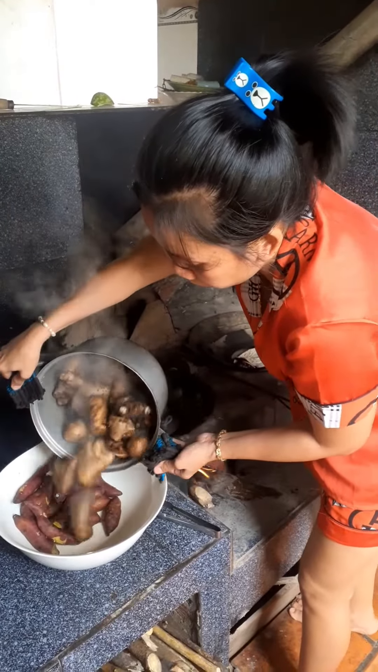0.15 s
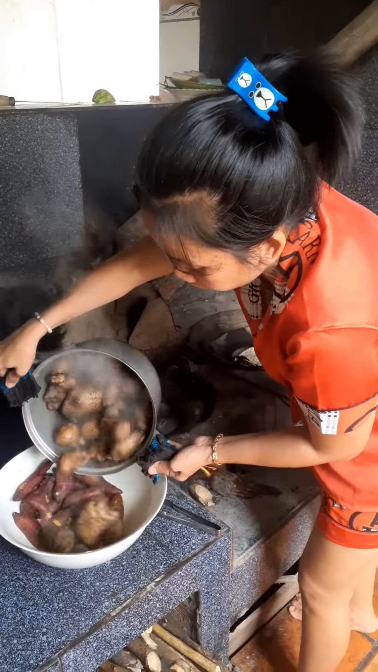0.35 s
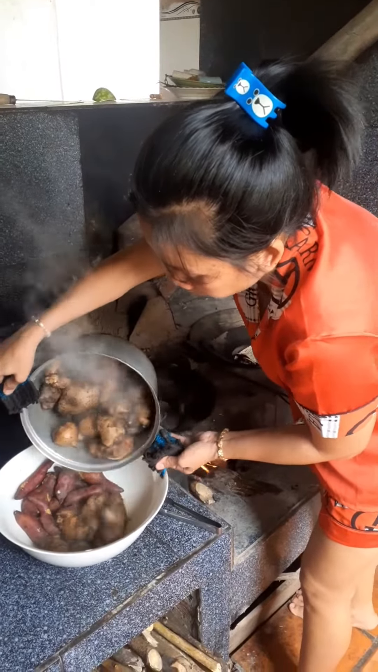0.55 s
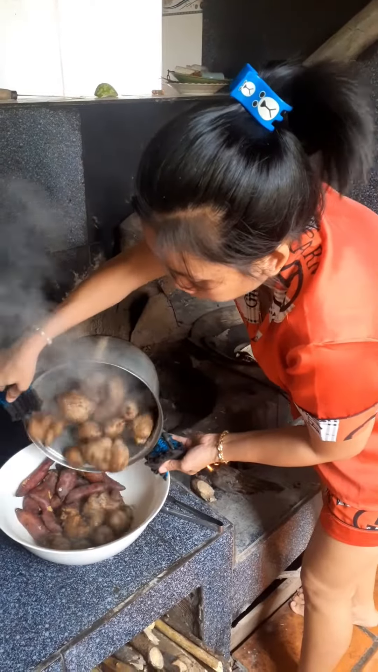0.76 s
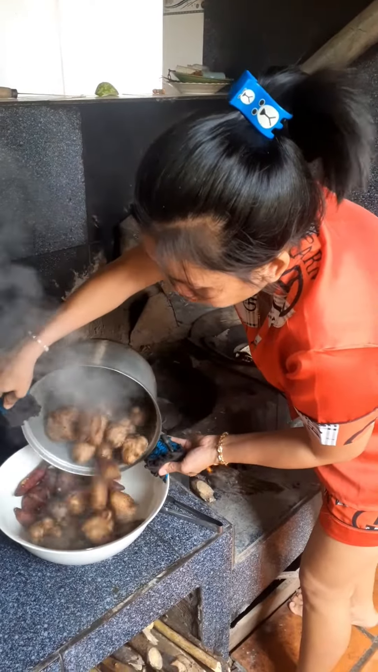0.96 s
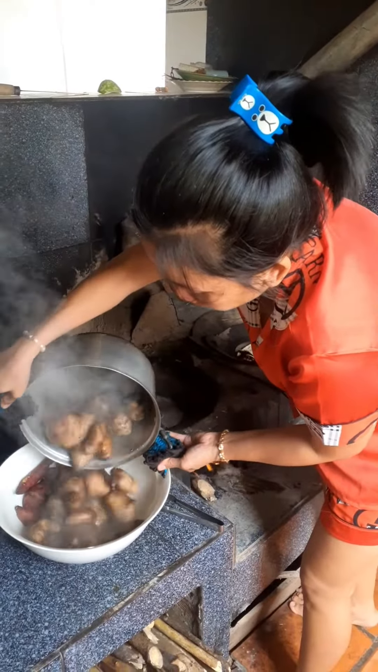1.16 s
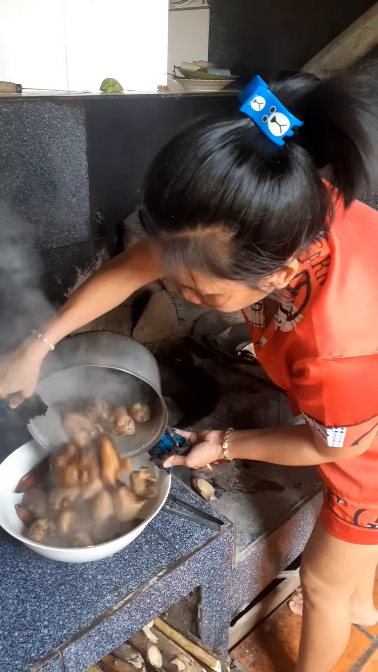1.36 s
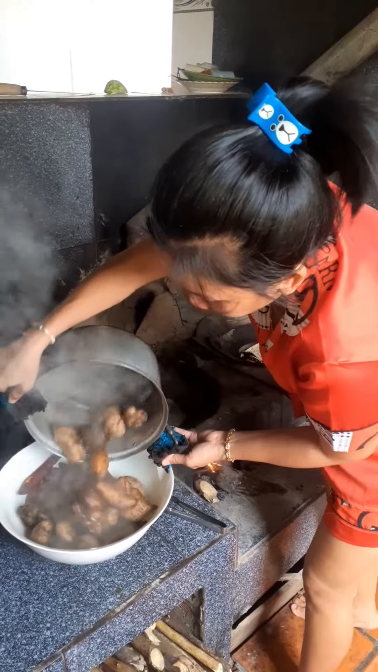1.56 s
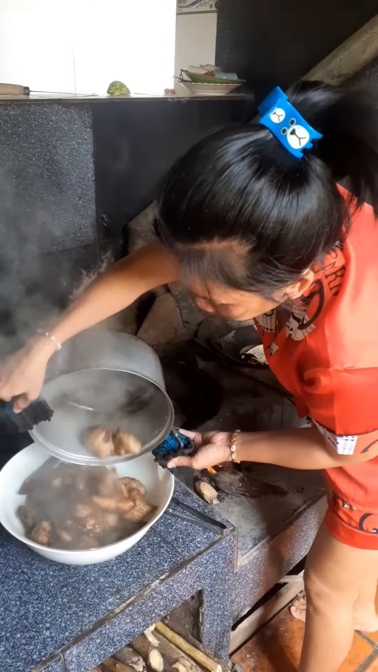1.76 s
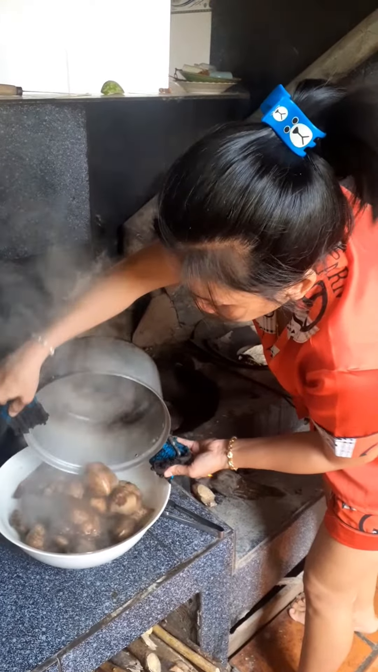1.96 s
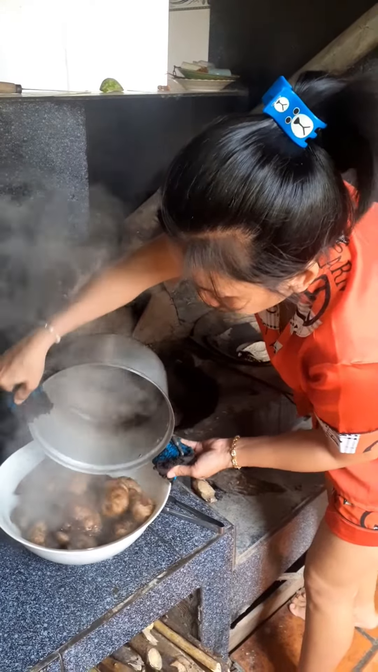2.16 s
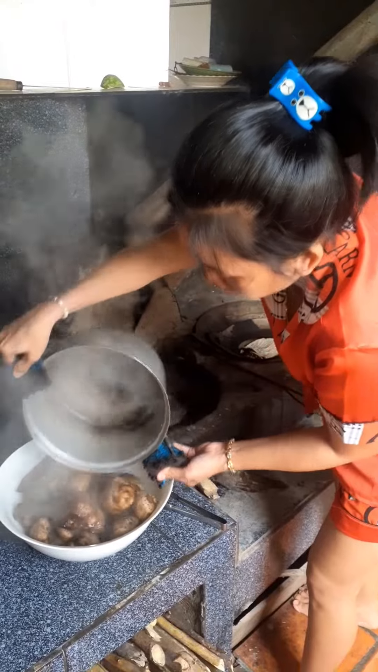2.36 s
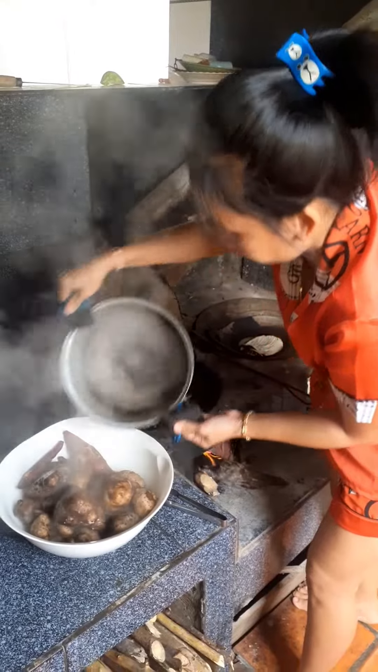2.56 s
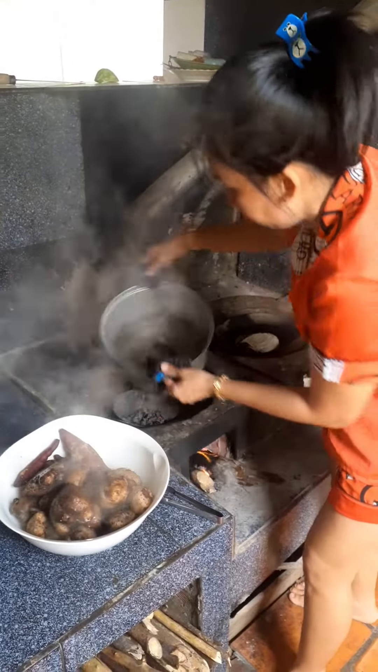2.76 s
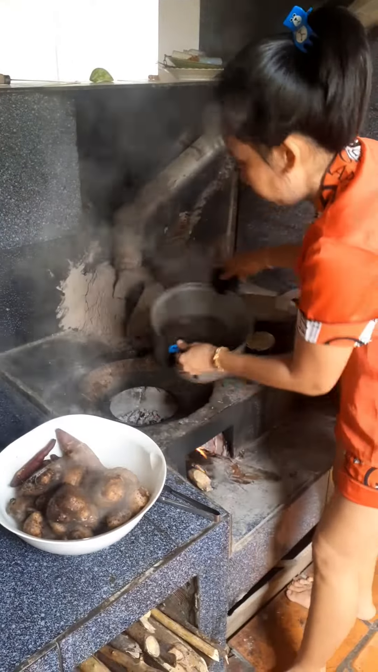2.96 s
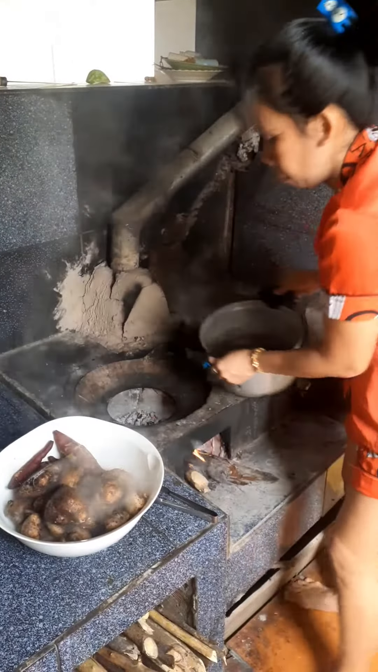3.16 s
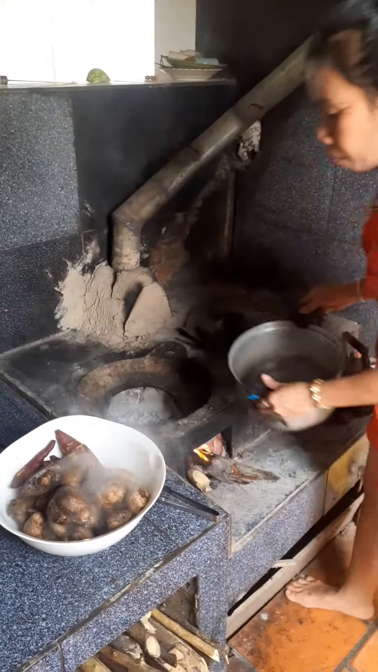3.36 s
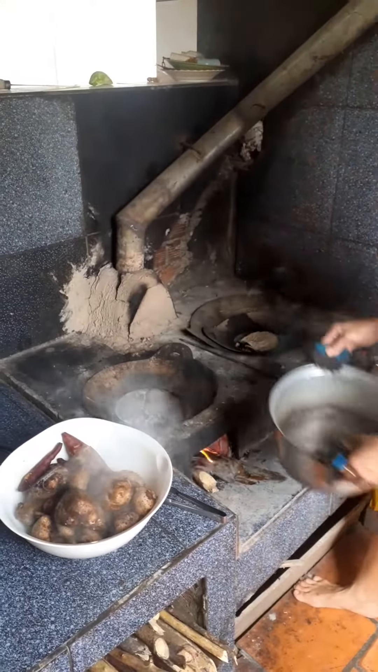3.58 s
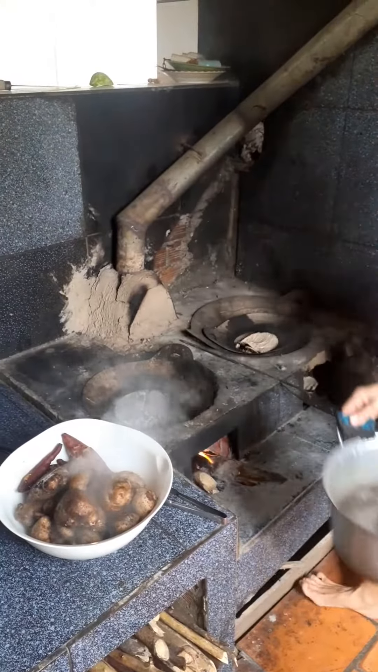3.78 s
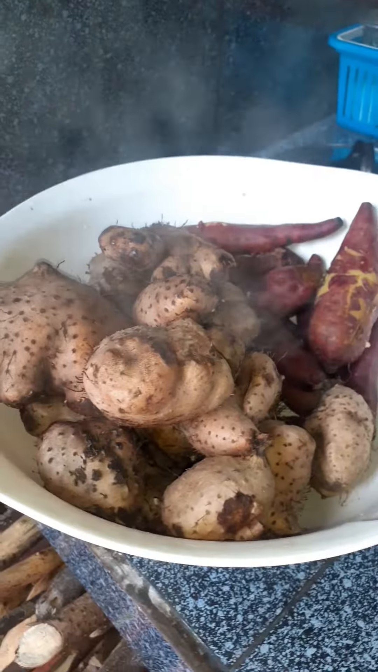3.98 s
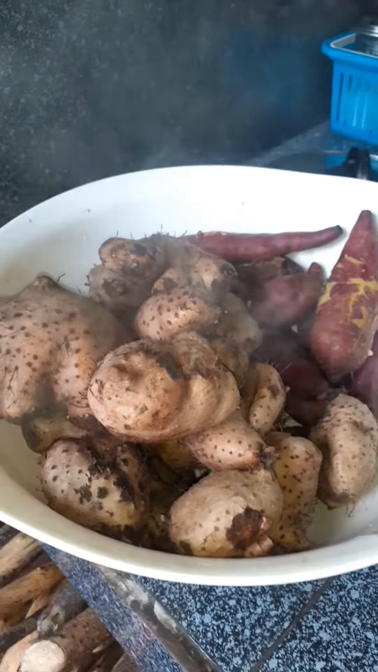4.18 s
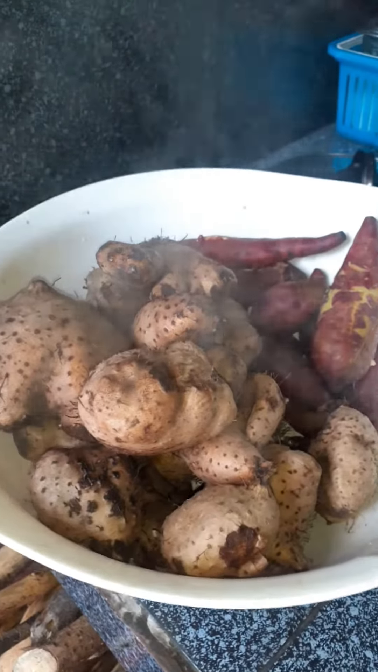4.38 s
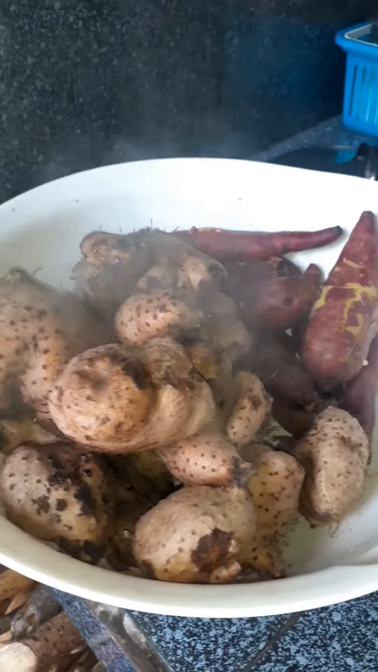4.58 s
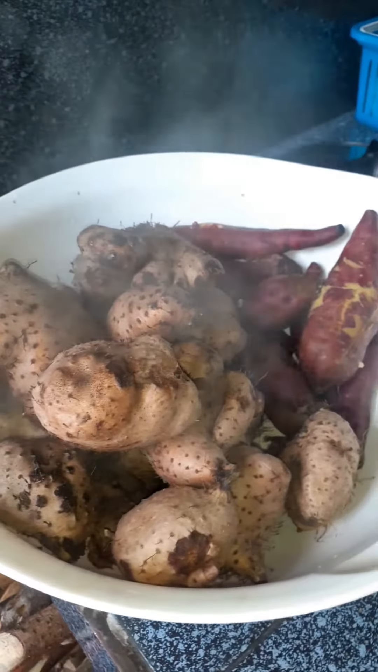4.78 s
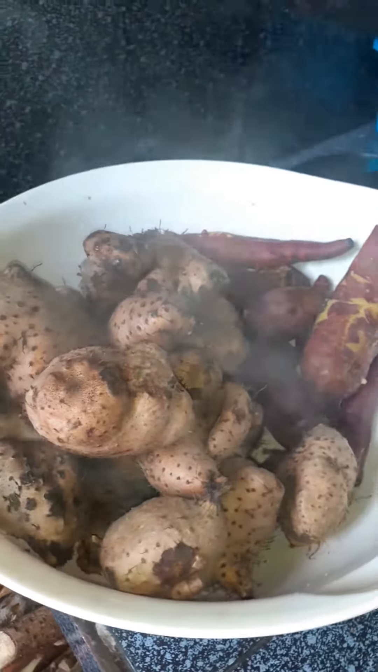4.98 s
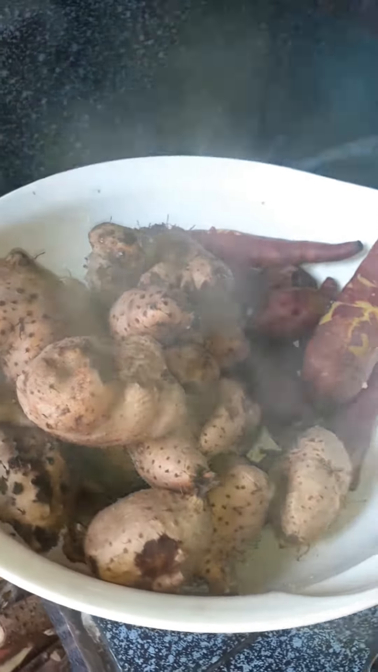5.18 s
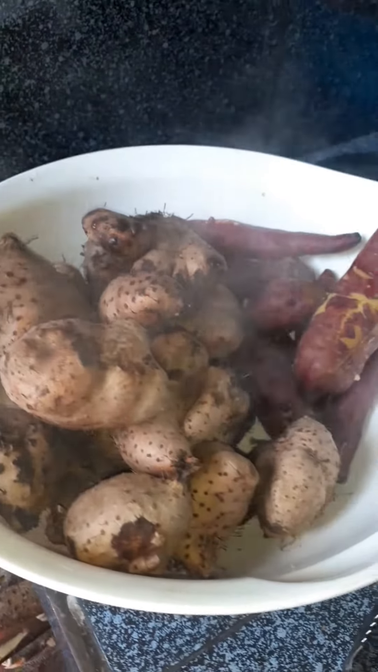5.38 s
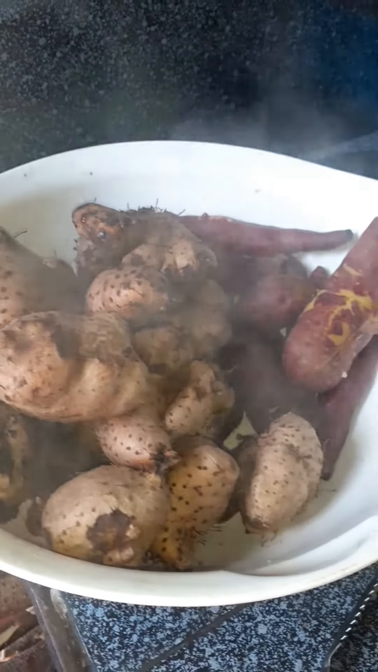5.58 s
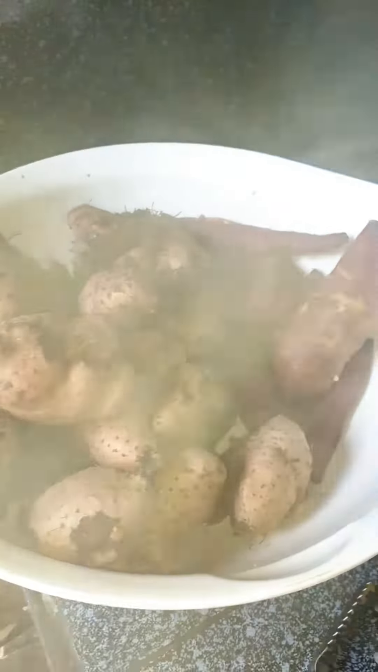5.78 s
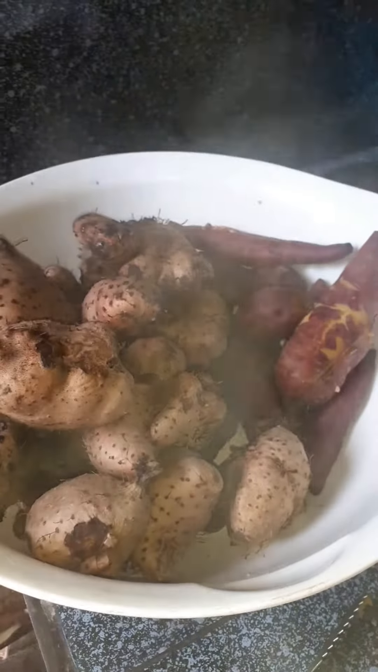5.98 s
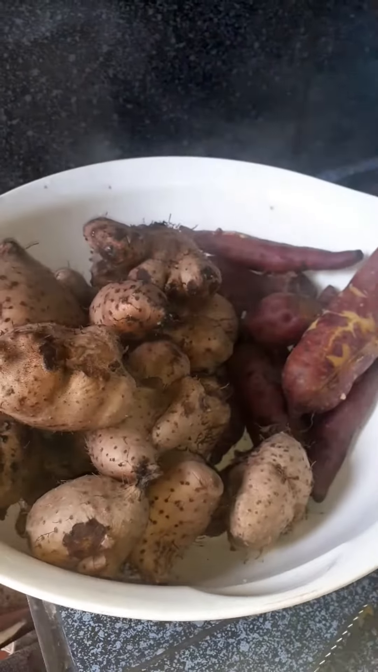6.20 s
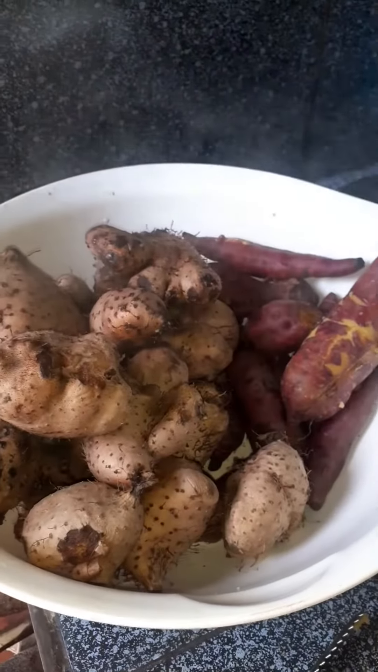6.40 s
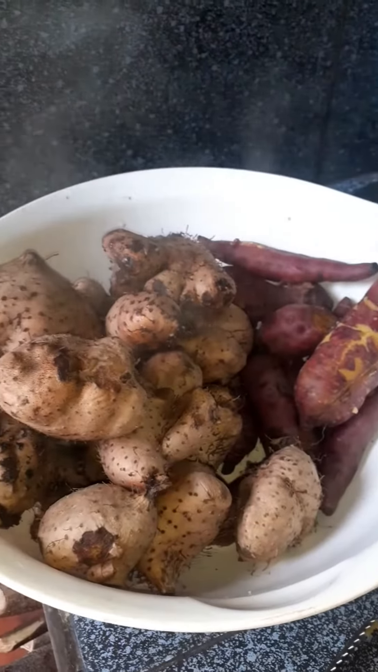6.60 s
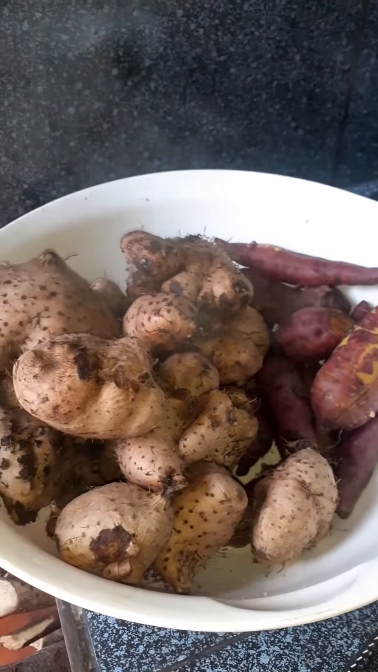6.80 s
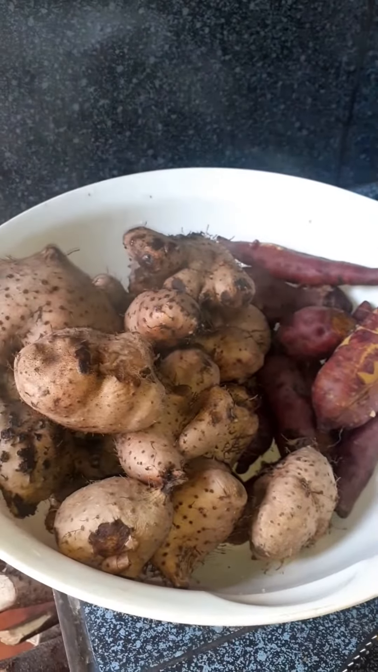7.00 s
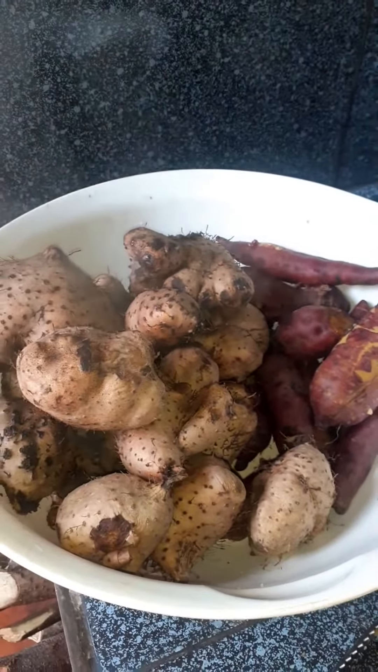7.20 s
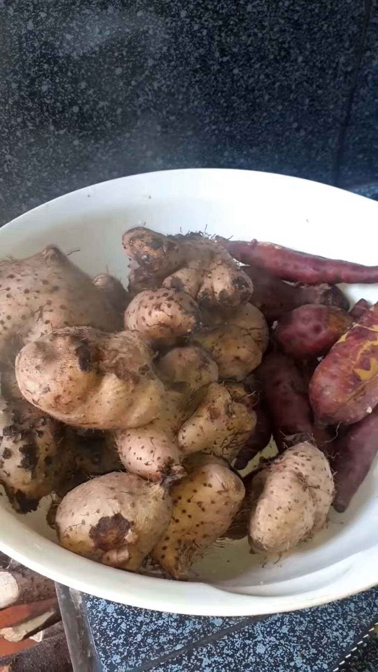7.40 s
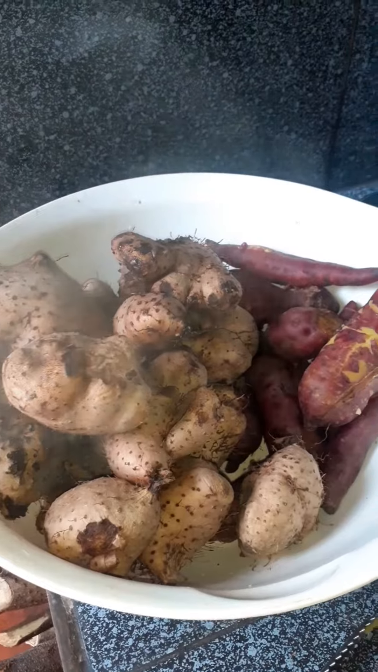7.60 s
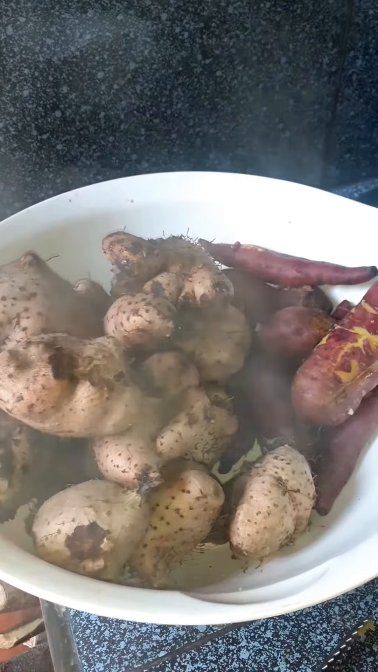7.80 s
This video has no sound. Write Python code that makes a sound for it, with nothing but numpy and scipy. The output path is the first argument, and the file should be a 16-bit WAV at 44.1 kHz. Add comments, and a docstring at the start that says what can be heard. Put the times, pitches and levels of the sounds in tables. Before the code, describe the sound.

A close stereo pickup in a hard-walled kitchen with short, dense echoes and faint low room tone. From 0 to about 0.7 s boiled potatoes tumble from a tilted metal pot into a bowl: rapid soft, low thuds, the loudest near 0.25 and 0.55 s, with wet slaps, sticky sliding and a dull rolling rumble. Another cluster lands around 0.9-1.1 s, then sparse faint bumps until 2.2 s, with thin rim clanks near 0.55, 0.95 and 1.7 s. Around 2.7-3.8 s come light handle ticks, a faint sizzle and hollow pot rattles, clearest at 3.15 s. A blink of silence just before 4 s cuts to water gushing and splashing, drumming on a basin with bubbling, low gulps and fine spray. After 5.4 s it drops away to weak spurts around 5.9-6.4 s, then plops and bright single drips until about 6.85 s, leaving quiet room tone and a faint wavering hum.

```python
"""Soft thuds and wet slaps: boiled potatoes roll out of a tilted metal pot into a bowl in a hard-walled kitchen.
Each thud is a set of damped modes; shaped noise gives the slaps, the rumble and the pot's clanks, and swarms
of tiny decaying sines the wet slides. After a blink of silence water gushes and splashes, sloshes on in weaker
spurts and ends in single drips: noise drums on a basin, decaying sines of rising pitch are the bubbles, and
short pings the drops. Random echoes and a faint room tone surround both parts."""
import sys
import numpy as np
from scipy import signal
from scipy.fft import rfft, irfft, next_fast_len
from scipy.io import wavfile
from scipy.ndimage import map_coordinates

SR = 44100
rng = np.random.default_rng(int(sys.argv[2]) if len(sys.argv) > 2 else 0)


def master(y):
    """Save y as 16-bit WAV."""
    cut = np.clip(np.atleast_2d(y).T, -1, 1)
    pcm = np.round(cut * 32767)  # scale
    wavfile.write(sys.argv[1], SR, pcm.astype(np.int16))


N = 346185  # length of the scene in samples
T = np.arange(int(0.8 * SR)) / SR  # time axis of one short event or echo, in seconds

# Potatoes landing. Each row: start in seconds, level in dB, pitch of the thud in Hz,
# level of the slap against the thud in dB.
POTATO_LANDINGS = [(0.001, -10, 312, -7), (0.013, -18.5, 321, -46), (0.052, -14.5, 342, -13),
                   (0.085, -22, 340, -20), (0.123, -27.5, 548, -13), (0.157, -28, 376, -13),
                   (0.237, -7, 257, -14.5), (0.251, -3.5, 379, -17), (0.281, -12.5, 340, -9.5),
                   (0.294, -13, 277, -12), (0.339, -19, 377, -14), (0.361, -15.5, 265, -21),
                   (0.392, -14, 246, -15.5), (0.41, -26, 293, -13), (0.448, -14, 419, -11),
                   (0.458, -14.5, 251, -12.5), (0.493, -28, 275, -28), (0.528, -20.5, 406, -7.5),
                   (0.558, -5.5, 310, -15), (0.585, -18.5, 288, -24), (0.6, -19, 282, -24),
                   (0.632, -23.5, 304, -20.5), (0.662, -24.5, 300, -19), (0.702, -28, 344, -15.5),
                   (0.862, -22.5, 234, -21), (0.92, -13, 266, -15.5), (0.929, -9, 281, -10.5),
                   (0.969, -14.5, 244, -25), (1.006, -15, 384, -20), (1.036, -22, 250, -24),
                   (1.075, -28, 279, -27), (1.182, -32, 256, -14), (1.244, -42, 270, -23),
                   (1.399, -31, 247, -27), (1.415, -35, 261, -20), (1.436, -32.5, 336, -7.5),
                   (1.449, -33, 245, -11.5), (1.477, -32, 235, -18), (1.5, -42, 290, -20),
                   (1.691, -35.5, 338, -2.5), (1.929, -26.5, 285, -13), (1.944, -28, 254, -10),
                   (1.963, -32, 255, -18), (2.186, -39, 233, -13), (2.21, -46, 259, -21),
                   (2.224, -42, 297, -14)]
# Likeness of left and right. Each row: frequency in Hz, correlation from 0 to 1.
STEREO_LIKENESS = [(130, 0.96), (290, 0.94), (640, 0.085), (1400, 0)]
# Colour of splashing water. Each row: frequency in Hz, level in dB.
SPLASH_COLOUR = [(240, 3.5), (400, 1.5), (449, -4), (650, -8), (708, -3), (982, -6.5), (1180, -6),
                 (1330, -9), (1630, -1), (2080, -8.5), (2570, -4), (3490, -11), (5000, -28), (6500, -50),
                 (11000, -120)]
# Colour of fine spray. Each row: frequency in Hz, level in dB.
SPRAY_COLOUR = [(1650, -39), (2800, -9), (4420, -6), (6100, -2), (7240, -1.5), (8060, -4.5), (9840, -19),
                (12200, -10.5), (14900, -17), (15400, -16)]


def amp(db):
    """Amplitude ratio of a level: 20 dB is a factor of ten."""
    return 10 ** (np.asarray(db) / 20)


def unit(x):
    """Normalise the mean power: scale to rms 1."""
    return x / np.sqrt(np.mean(x ** 2) + 1e-20)


def peaked(x):
    """Normalise the amplitude: scale to peak 1."""
    return x / (np.abs(x).max() + 1e-20)


def fade(t, t60):
    """Exponential damping: the amplitude falls by 60 dB in t60."""
    return np.exp(-np.log(1000) * t / t60)


def along(points, hz):
    """Interpolate (Hz, value) points linearly in log frequency."""
    point_hz, values = np.transpose(points)
    return np.interp(np.log(hz + 1), np.log(point_hz), values)


def curves(rows):
    """Interpolate linearly in time: one value per sample for each column after the time."""
    times, *columns = np.transpose(rows)
    return [np.interp(np.arange(N) / SR, times, column) for column in columns]


def add(track, s, sound):
    """Superpose a sound on the track at time s."""
    start = max(round(s * SR), 0)
    track[:, start:start + sound.shape[-1]] += sound[..., :N - start]


def filtered(x, response):
    """Linear filtering: multiply the spectrum of x by a response of frequency."""
    size = next_fast_len(x.shape[-1] + 4096)
    spectrum = rfft(x, size) * response(np.fft.rfftfreq(size, 1 / SR))
    return irfft(spectrum, size)[..., :x.shape[-1]]


def coloured(x, spectrum):
    """Spectral shaping: filter x by a curve of (Hz, dB)."""
    return filtered(x, lambda hz: amp(along(spectrum, hz)))


def half_angle(hz):
    """Half the angle whose cosine is the left-right correlation at this frequency."""
    return np.arccos(np.clip(along(STEREO_LIKENESS, hz), -1, 1)) / 2


def diffuse(pair):
    """Diffuse field: two unrelated signals become alike in the bass and unrelated in the treble."""
    def shares(hz):
        return np.array([np.cos(half_angle(hz)), np.sin(half_angle(hz))])
    mid, side = filtered(pair, shares)
    return np.array([mid + side, mid - side])


def noise(spectrum):
    """Stationary noise: a shaped diffuse field of rms 1."""
    return unit(coloured(diffuse(rng.standard_normal((2, N))), spectrum))


def in_kitchen(x, wet_db, near_db, near_t60=0.12):
    """Reverberation: convolve with dense, fast-fading wall echoes and a longer room tail."""
    # Decay of the room. Each row: frequency in Hz, t60 in seconds.
    room_decay = [(120, 0.77), (320, 0.59), (840, 0.7), (2200, 0.69), (6000, 0.66), (14000, 0.78)]
    hz, t, z = signal.stft(rng.standard_normal((2, len(T))), SR, nperseg=256)
    decaying = z * fade(t, along(room_decay, hz)[:, None])
    tail = signal.istft(decaying, SR, nperseg=256)[1][:, :len(T)]
    near = rng.standard_normal((2, len(T))) * fade(T, near_t60)
    echoes = diffuse(amp(wet_db) * unit(tail) + amp(near_db) * unit(near)) / np.sqrt(len(T))
    echoes *= np.minimum(T / 0.0016, 1)  # the echoes build up over 1.6 ms
    x = np.atleast_2d(x)
    return x + signal.fftconvolve(x, echoes, axes=1)[:, :x.shape[1]]


def ring(modes, scatter_db):
    """Modal synthesis: damped sines of random strength, out of step between the channels when high."""
    out = np.zeros((2, len(T)))
    for hz, db, t60 in modes:
        lead = half_angle(hz) * rng.choice([-1, 1])
        phase = 2 * np.pi * hz * T + np.array([[lead], [-lead]])
        strength = amp(db + scatter_db * rng.normal())
        out += strength * fade(T, t60) * np.sin(phase)
    return out


def crack(spectrum, t60):
    """Contact noise: a shaped, exponentially damped burst with peak 1."""
    burst = rng.standard_normal(len(T)) * fade(T, t60) * np.minimum(T / 0.00093, 1)
    return peaked(coloured(burst, spectrum))


def delayed(x, samples):
    """Pure delay: shift an event later within its time axis."""
    return np.pad(x, (samples, 0))[:len(T)]


def rattle(colour):
    """Repeated impact: a blow followed by four uneven, ever weaker recontacts."""
    first_db, mean_gap_s, loss_db = -13, 0.014, 2  # the loss is per recontact
    out = crack(colour, t60=0.048)
    times = np.cumsum(mean_gap_s * (0.5 + rng.random(size=4)))
    for k, s in enumerate(times):
        out = out + amp(first_db - loss_db * k) * delayed(crack(colour, t60=0.033), int(s * SR))
    return out


def bubble(t, hz, cycles, rise):
    """Bubble resonance: a sine falls 60 dB in the given cycles, its pitch rising towards the surface."""
    age = t * hz / cycles
    tone = np.sin(2 * np.pi * hz * t * (1 + rise * np.minimum(age, 1) / 2))
    return tone * fade(age, 1.0) * (1 - np.exp(-t * hz))


def swarm(rate, low_hz, high_hz, cycles, spread_db, wet_db, size):
    """Granular superposition: short decaying sines at random, in three groups with their own echoes."""
    out = np.zeros((2, N))
    for _ in range(3):
        count = int(rate * N / SR)  # rate is in grains per second for one group
        when, pitch, strength, side = rng.random((count, 4)).T[:, :, None]
        hz = low_hz * (high_hz / low_hz) ** pitch
        gain = amp(-spread_db * np.log(np.maximum(strength, 0.01))) * hz / high_hz
        grains = gain * bubble(np.arange(size) / SR, hz, cycles, rise=0.12)
        at = ((when * N).astype(int) + np.arange(size)).ravel()
        pans = (np.sqrt(side), np.sqrt(1 - side))
        direct = np.array([np.bincount(at, (grains * pan).ravel(), N + size)[:N] for pan in pans])
        out += in_kitchen(direct, wet_db, near_db=9.0)
    return unit(out)


def swell(start, length, rise_s, fall_db_per_s):
    """Amplitude envelope: a linear rise, full until its length has passed, then an exponential fall."""
    age = np.arange(N) / SR - start
    return np.clip(age / rise_s, 0, 1) * amp(-fall_db_per_s * np.maximum(age - length, 0))


def until(end, fall_db_per_s):
    """Amplitude envelope: full until the end, then an exponential fall."""
    return amp(-fall_db_per_s * np.maximum(np.arange(N) / SR - end, 0))


def together(gains):
    """Incoherent addition: unrelated sounds add in power."""
    return np.sqrt(sum(g ** 2 for g in gains))


def standing_waves(x):
    """Room resonance: standing waves between counter and walls lift or hollow narrow bands."""
    # Each row: frequency in Hz, bandwidth in Hz, gain at the centre in dB.
    bands = [(138, 19, -3), (188, 13, -3), (403, 39, -8.5), (590, 25, 0.5), (740, 110, -4.5),
             (1620, 260, 2.5)]
    for hz, width_hz, db in bands:
        b, a = signal.iirpeak(hz, hz / width_hz, fs=SR)
        x = x + (amp(db) - 1) * signal.lfilter(b, a, x)
    return x


def stove_air():
    """Stationary background noise: the room tone by the stove."""
    # Each row: frequency in Hz, level in dB.
    air_colour = [(18, -52), (30, -25.5), (113, -5), (211, -10.5), (337, 0.5), (426, -5.5), (485, -12.5),
                  (698, -15), (837, -14.5), (1140, -19.5), (1600, -17.5), (3320, -23.5), (3880, -27),
                  (6040, -29), (15000, -50)]
    return amp(-55) * noise(air_colour)


def bowl_air():
    """Stationary background noise: the room tone by the bowl."""
    # Each row: frequency in Hz, level in dB.
    air_colour = [(18, -49), (30, -17), (119, -1), (185, -11), (216, -8), (247, -7.5), (337, -5.5),
                  (437, -6.5), (511, -12.5), (680, -15.5), (774, -14), (859, -14), (1000, -15),
                  (1140, -17.5), (1270, -17.5), (3980, -32.5), (6700, -21), (10200, -36.5), (15000, -32)]
    return amp(-57.5) * noise(air_colour)


def hum():
    """Slow modulation: a few faint tones waver in level and phase."""
    # Each row: frequency in Hz, mean level in dB.
    tones = [(122, -74), (216, -72.5), (328, -70.5), (426, -72), (668, -75.5)]
    drift_step_s = 0.3
    t = np.arange(N) / SR
    knots = np.arange(0, t[-1] + drift_step_s, drift_step_s)

    def drift():
        return np.interp(t, knots, rng.standard_normal(len(knots)))

    out = np.zeros(N)
    for hz, db in tones:
        level = amp(db + 4.6 * drift()) * np.sqrt(2)  # drift in dB
        out += level * np.sin(2 * np.pi * hz * t + 1.1 * drift())  # drift in radians
    return out


def tipping():
    """Rolling and sliding friction: noise rumbles after landings, swarming grains are the wet slips."""
    # Colour of the rumble. Each row: frequency in Hz, level in dB.
    roll_colour = [(41, -68), (70, -50), (108, -21), (182, -14.5), (265, -4), (347, -2), (403, -5.5),
                   (441, -1), (504, -16), (620, -9.5), (931, -34.5), (1570, -32.5), (2500, -34),
                   (3250, -50.5), (5500, -120)]
    # Colour of wet sliding. Each row: frequency in Hz, level in dB.
    slide_colour = [(350, -35), (600, -10), (716, -9), (890, -21), (1620, -13.5), (2270, -17.5),
                    (2940, -10.5), (4020, -15.5), (6380, -11.5), (9590, -27.5), (15400, -23.5)]
    # Slips on the wall, first potatoes, then hands. Each row: start in seconds, length in seconds,
    # level in dB.
    slips = [(0.0, 0.22, -59), (0.327, 0.064, -52.5), (0.553, 0.036, -48), (0.785, 0.037, -48),
             (1.357, 0.034, -53.5), (1.58, 0.045, -56), (2.002, 0.067, -56.5), (2.67, 0.1, -65),
             (2.964, 0.21, -62.5), (3.415, 0.03, -66), (3.715, 0.031, -58.5), (3.84, 0.053, -61.5)]
    rumble_db, rumble_rise_s, rumble_fall_db_per_s = -24, 0.036, 65.5  # level against the thud
    slip_rise_s, slip_fall_db_per_s = 0.0081, 104
    # the load creeps over the wall while the pot is tilted
    creep = amp(-58.5) * until(1.63, fall_db_per_s=60)
    rumble_gains = [amp(db + rumble_db) * swell(s, rumble_rise_s, rumble_rise_s, rumble_fall_db_per_s)
                    for s, db, _, _ in POTATO_LANDINGS]
    slip_gains = [amp(db) * swell(s, length, slip_rise_s, slip_fall_db_per_s) for s, length, db in slips]
    roll = together(rumble_gains)
    slide = together([creep] + slip_gains)
    sticky = swarm(rate=210, low_hz=920, high_hz=14700, cycles=6.9, spread_db=4.0, wet_db=13.0, size=160)
    return roll * noise(roll_colour) + slide * unit(coloured(sticky, slide_colour))


def pot():
    """Impact excitation: the rim clanks, handles tick, the hollow body rattles; a drop sizzles."""
    # Knocks on the rim. Each row: start in seconds, level in dB.
    clanks = [(0.5592, -29), (0.9268, -36.5), (1.0117, -34), (1.296, -41.5), (1.6889, -27.5), (3.7224, -43)]
    # Colour of the rim. Each row: frequency in Hz, level in dB.
    rim_colour = [(500, -20), (1050, -2.5), (1550, -3), (2200, -15), (2800, 3.5), (3450, 6), (4000, -5),
                  (5300, -10.5), (6700, -1), (9000, -41), (15000, -44)]
    # Light touches on the handles. Each row: start in seconds, level in dB.
    ticks = [(2.764, -43), (3.043, -52), (3.125, -44), (3.725, -45)]
    # Colour of a tick. Each row: frequency in Hz, level in dB.
    tick_colour = [(500, -20), (1200, 2), (3100, 10), (4200, -2), (6200, -2), (8000, -9), (11000, -32)]
    # Bumps of the body. Each row: start in seconds, level in dB, level of the low knock against it
    # in dB, brightness in dB per octave.
    bumps = [(3.145, -31.5, -9, 0), (3.316, -46.5, -5, -4.5), (3.644, -37.5, 0.5, -1), (3.719, -38, -8, -3),
             (3.751, -49.5, 1, 13)]
    # Colour of the hollow body before brightening. Each row: frequency in Hz, level in dB.
    hollow_colour = [(300, -11.5), (560, -7), (780, 6.5), (880, -7), (980, 6), (1250, -0.5), (1650, 3),
                     (2100, -7.5), (2850, 2.5), (3400, -6), (4000, -12.5), (6000, -14.5), (9000, -51)]
    # Colour of the pot's base. Each row: frequency in Hz, level in dB.
    base_colour = [(150, -23), (330, 3), (430, 1.5), (600, -10), (1200, -56)]
    # Modes of the wall. Each row: frequency in Hz, mean level in dB, t60 in seconds.
    wall_modes = [(418, 0, .3), (766, -3.5, 0.23), (983, 10, 0.18), (1111, -14, 0.36), (1170, -9.5, .3),
                  (1280, -8.5, 0.28), (1640, -31, 0.16), (1636, 0, 0.3), (2682, -14, .2), (2790, -14, .16),
                  (2770, -8, 0.2), (2960, -15, .16)]
    # Colour of a drop on the hot stove. Each row: frequency in Hz, level in dB.
    sizzle_colour = [(3000, -25), (6200, -8), (7600, 6), (8600, -8), (10500, -23)]
    out = np.zeros((2, N))
    for s, db in clanks:
        add(out, s, amp(db) * in_kitchen(crack(rim_colour, t60=0.026), wet_db=-2.0, near_db=-1))
    for s, db in ticks:
        add(out, s, amp(db) * in_kitchen(crack(tick_colour, t60=0.017), wet_db=5.5, near_db=-2))
    for s, db, knock_db, bright_db in bumps:
        wall = amp(-16) * peaked(ring(wall_modes, scatter_db=2))
        lowest_hz = hollow_colour[0][0]
        colour = [(hz, level + bright_db * np.log2(hz / lowest_hz)) for hz, level in hollow_colour]
        body = rattle(colour) + amp(knock_db) * crack(base_colour, t60=0.053)
        add(out, s, amp(db) * in_kitchen(body + wall, wet_db=7.5, near_db=-2))
    sizzle = crack(sizzle_colour, t60=0.27)
    add(out, 2.927, amp(-52.5) * in_kitchen(sizzle, wet_db=4, near_db=-3))
    return out


def drops():
    """Bubble resonance: big air pockets gulp low, smaller ones plop, and drips tick and ping high."""
    # Big air pockets. Each row: start in seconds, level in dB, pitch in Hz.
    gulps = [(4.767, -29.5, 212), (4.79, -33.5, 212), (4.833, -31.5, 225), (4.861, -29.5, 259),
             (5.027, -35, 253), (5.05, -39, 242)]
    # Single large bubbles. Each row: start in seconds, level in dB, pitch in Hz, t60 in seconds.
    plops = [(4.198, -34.5, 1745, 0.052), (4.219, -35, 1760, 0.025), (4.385, -31, 1560, 0.023),
             (4.637, -23, 1595, 0.027), (4.641, -23, 1695, 0.021), (4.646, -29.5, 1160, 0.037),
             (4.742, -34, 1580, 0.022), (5.213, -31.5, 1630, 0.035), (5.838, -52, 2750, 0.008),
             (5.903, -36, 2740, 0.005), (5.92, -32, 1550, 0.0059), (6.22, -42.5, 1470, .02),
             (6.304, -35.5, 1520, 0.02), (6.481, -42, 890, 0.051), (6.757, -48, 2916, 0.023)]
    # Drops landing in water. Each row: start in seconds, level in dB, pitch in Hz,
    # level of the tick against the ping in dB.
    drips = [(4.412, -29.5, 7200, -2), (4.765, -41, 7300, -1), (5.098, -23.5, 6570, -7),
             (5.6246, -42.5, 5500, 6), (5.6952, -43, 7400, 10), (5.838, -49, 5970, 7),
             (6.0878, -26, 6030, -29.5), (6.1783, -35, 5700, 4.5), (6.389, -32.5, 6800, -5),
             (6.5928, -30, 7000, -16.5), (6.758, -45.5, 6500, -2), (6.84, -37, 7300, -10)]
    out = np.zeros((2, N))
    for s, db, hz in gulps:
        gulp = peaked(bubble(T, hz, cycles=19, rise=0.092))
        add(out, s, amp(db) * in_kitchen(gulp, wet_db=-0.5, near_db=-2.0))
    for s, db, hz, t60 in plops:
        plop = peaked(bubble(T, hz, t60 * hz, rise=0.02)) + amp(-16.0) * crack(SPLASH_COLOUR, t60=0.017)
        add(out, s, amp(db) * in_kitchen(plop, wet_db=5.0, near_db=0))
    for s, db, hz, tick_db in drips:
        ping = peaked(bubble(T, hz, cycles=26, rise=0.027))
        drip = ping + amp(tick_db) * crack(SPRAY_COLOUR, t60=0.013)
        add(out, s, amp(db) * in_kitchen(drip, wet_db=5.5, near_db=3.0))
    return out


def surges():
    """Collective resonance: a bubble cloud rings in a fuzzy band, higher as it shrinks, lower as it grows."""
    # One table for each cloud. Each row: time in seconds, pitch in Hz, level in dB.
    clouds = [
        [(4.62, 519.4, -57), (4.665, 572, -39.5), (4.74, 540, -46.5)],
        [(4.81, 478, -57), (4.845, 524, -34), (4.87, 740, -41.5), (4.93, 820, -65)],
        [(5.17, 1607, -54), (5.25, 1900, -38.5), (5.33, 2360, -54)],
        [(5.31, 329.2, -59), (5.38, 430.5, -41.5), (5.42, 661, -39), (5.46, 789, -42.5), (5.5, 820, -66)],
        [(5.835, 2810, -62), (5.895, 2585, -47), (5.908, 2760, -45.5), (6.02, 2795, -43.5), (6.08, 2560, -60)],
        [(5.912, 1446, -59.5), (5.925, 1404, -38.5), (5.985, 1300, -46), (6.03, 719, -50.5), (6.1, 600, -55)],
        [(6.215, 3030, -44), (6.235, 2950, -45), (6.33, 2695, -51)],
        [(6.385, 2596, -45.5), (6.41, 2620, -52), (6.52, 2490, -57)],
    ]
    knots_per_cycle = 0.6  # how often the band's amplitude and phase wander
    clump_db, clumps_per_s = 3, 160
    out = np.zeros((2, N))
    t = np.arange(N) / SR
    for rows in clouds:
        hz, db = curves(rows)
        cycle = np.cumsum(hz) / SR
        knot = cycle * knots_per_cycle
        randoms = rng.standard_normal((4, SR // 2))
        wander = np.array([map_coordinates(row, [knot], order=1) for row in randoms])
        band = wander[:2] * np.cos(2 * np.pi * cycle) + wander[2:] * np.sin(2 * np.pi * cycle)
        flicker = map_coordinates(rng.standard_normal(SR // 2), [t * clumps_per_s], order=1)
        sounding = (t > rows[0][0]) * (t < rows[-1][0])
        out += amp(db) * unit(band * amp(clump_db * flicker)) * sounding
    return in_kitchen(out, wet_db=-6.5, near_db=-4.5)


def water():
    """Turbulent flow: a stream drums on a basin, churns bubbles, throws spray and spurts on as it fades."""
    # Course of the drumming. Each row: time in seconds, level in dB.
    drumming = [(4.0, -36.5), (4.27, -41), (4.34, -38), (4.45, -42.5), (4.72, -37.5), (4.82, -47),
                (4.87, -38), (4.94, -39), (5.12, -41), (5.26, -57), (5.41, -46), (5.65, -78)]
    # Colour of water beating on a basin. Each row: frequency in Hz, level in dB.
    drum_colour = [(53, -46), (90, -21), (178, -12.5), (216, -3), (281, -4.5), (347, 3.5), (450, -15.5),
                   (500, -14), (661, -17), (742, -32), (900, -10.5), (1170, -49), (1980, -120)]
    # Spurts during and after the stream. Each row: start in seconds, length in seconds,
    # spray level in dB, splash level against the spray in dB, rise in seconds.
    spurt_rows = [(4.041, 0.036, -39.5, 4, 0.028), (4.145, 0.086, -39, -11, 0.02),
                  (4.394, 0.043, -37.5, -6.5, 0.016), (4.621, 0.074, -38, -18, .03),
                  (4.737, 0.2, -37.5, -1.5, 0.033), (4.92, 0.028, -41, -13, .03),
                  (5.148, 0.12, -37, -7.5, 0.024), (5.339, 0.029, -37, -19, .03),
                  (5.62, 0.12, -51, -10, 0.034), (5.834, 0.099, -47, -16, 0.0091),
                  (5.913, 0.14, -39.5, -3, 0.021), (6.094, 0.17, -44, -14, 0.0036),
                  (6.226, 0.023, -36, -9.5, 0.0059), (6.407, 0.13, -47, -8.5, .005),
                  (6.615, 0.12, -57, -19, .03), (6.753, 0.065, -55.5, -11, .005)]
    # Colour of a spurt's broad splash. Each row: frequency in Hz, level in dB.
    spurt_colour = [(250, 9.5), (550, -9), (900, -9.5), (1300, -1.5), (1900, -1.5), (2700, -4), (3800, -9),
                    (5500, -10), (7500, -26)]
    stream = until(5.386, fall_db_per_s=74)
    splash_gains, spray_gains = [], [amp(-39) * stream]
    for s, length, db, splash_db, rise_s in spurt_rows:
        spurt = amp(db) * swell(s, length, rise_s, fall_db_per_s=93)
        spray_gains.append(spurt)
        splash_gains.append(amp(splash_db) * spurt)
    drum_db, = curves(drumming)
    churn = swarm(rate=350, low_hz=405, high_hz=5070, cycles=22.5, spread_db=3.5, wet_db=8.5, size=700)
    froth = swarm(rate=500, low_hz=455, high_hz=6000, cycles=9.9, spread_db=2.5, wet_db=11.0, size=400)
    droplets = swarm(rate=500, low_hz=2600, high_hz=14600, cycles=4.0, spread_db=4.0, wet_db=9.5, size=96)
    near_drops = swarm(rate=45, low_hz=4420, high_hz=14500, cycles=5.4, spread_db=3.5, wet_db=-4.5, size=96)
    drum = amp(drum_db) * noise(drum_colour)
    splash = amp(-39.5) * stream * unit(coloured(churn, SPLASH_COLOUR))
    spurts = together(splash_gains) * unit(coloured(froth, spurt_colour))
    spray = together(spray_gains) * unit(coloured(droplets + amp(-4.5) * near_drops, SPRAY_COLOUR))
    return drum + splash + spurts + spray


def potatoes():
    """Soft impact: a slow push excites the bowl's low modes; wet skin slaps and scuffs with noise."""
    # The loaded bowl on its counter. Each row: frequency in Hz, mean level in dB, t60 in seconds.
    bowl_modes = [(119, -23.5, 0.25), (170.3, -23.5, 0.18), (267.1, -19, 0.24), (297, -17, 0.15),
                  (343.3, -15.5, 0.2), (437, -23.5, 0.3), (382, -4.5, 0.032), (584, -27, 0.19)]
    # The bowl's wall, struck through the pile. Each row: frequency in Hz, mean level in dB,
    # t60 in seconds.
    wall_modes = [(483, -2, 0.031), (573, 1, 0.059), (680, -2, 0.021)]
    # Colour of wet skin on the bowl. Each row: frequency in Hz, level in dB.
    slap_colour = [(200, -6.5), (600, 12), (900, -1), (1250, -2.5), (1650, -0.5), (2200, -11.5),
                   (3100, -13), (4200, -20.5), (7000, -27.5), (15000, -60)]
    wall_db, wall_growth = -11.5, 0.55  # level at the hardest landing, dB lost per dB of softer landing
    scuff_db, scuff_within_s = -9, 0.03
    out = np.zeros((2, N))
    small_body = signal.butter(3, 125, "high", fs=SR, output="sos")  # a bowl radiates little deep bass
    hardest_db = max(row[1] for row in POTATO_LANDINGS)
    squash = (1 - np.exp(-T / 0.0019)) ** 2  # soft flesh builds up its push slowly
    for s, db, hz, slap_db in POTATO_LANDINGS:
        bounce = np.sin(2 * np.pi * hz * T) * fade(T, 0.05)
        struck = (bounce + ring(bowl_modes, scatter_db=3)) * squash
        thud = peaked(signal.sosfilt(small_body, struck))
        wall_gain = amp(wall_db + wall_growth * (db - hardest_db))
        wall = wall_gain * peaked(ring(wall_modes, scatter_db=7.0) * squash)
        slap = crack(slap_colour, t60=0.029)
        # two smaller contacts follow each slap
        for late in (rng.random(size=2) * scuff_within_s * SR).astype(int):
            slap = slap + amp(scuff_db) * delayed(crack(slap_colour, t60=0.0025), late)
        body = in_kitchen(thud + wall, wet_db=-9.5, near_db=-9.5)
        skin = in_kitchen(slap, wet_db=2.0, near_db=-1.5)
        add(out, s, amp(db) * (body + amp(slap_db) * skin))
    return out


def scene():
    """Superposition in two parts: the tipping, a blink of silence, then the water, each over room tone."""
    # The silence: start in seconds, end in seconds.
    silence_start, silence_end = (3.95, 3.997)
    t = np.arange(N) / SR
    first = stove_air() + tipping() + pot() + standing_waves(potatoes())
    second = bowl_air() + hum() + drops() + surges() + water()
    return first * (t < silence_start) + second * (t > silence_end)


def record(dry):
    """Band-limited stereo pickup: the channels differ in level with frequency; none passes 15.6 kHz."""
    # Each row: frequency in Hz, level of left minus right in dB.
    balance = [(120, -3), (380, -4), (800, -2), (1600, -4.5), (2400, -5), (4000, -5.5), (6500, -12.5),
               (8000, -9), (9500, 2), (15000, 1)]

    def ports(hz):
        left = amp(along(balance, hz))
        pair = np.array([left, np.ones_like(left)])
        return pair / np.sqrt((1 + left ** 2) / 2) * (hz < 15600)  # the pair keeps its mean power

    return filtered(dry, ports)


dry = scene()
out = record(dry)
master(out)
```